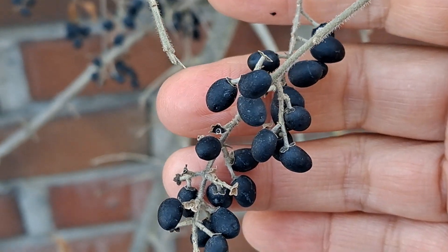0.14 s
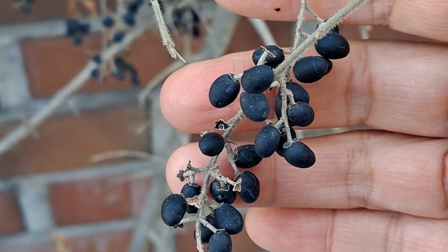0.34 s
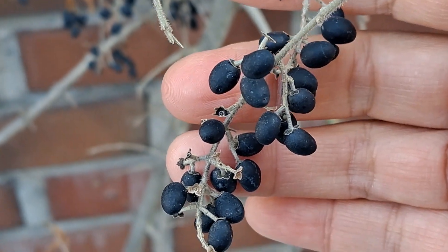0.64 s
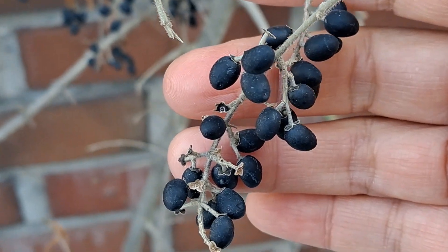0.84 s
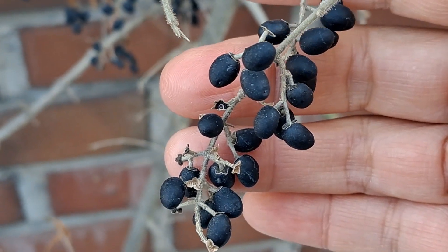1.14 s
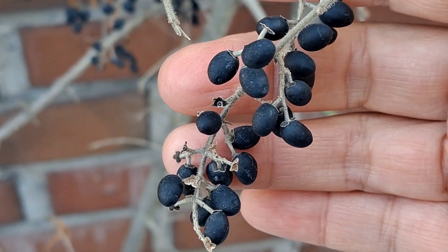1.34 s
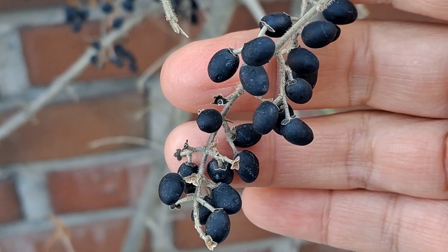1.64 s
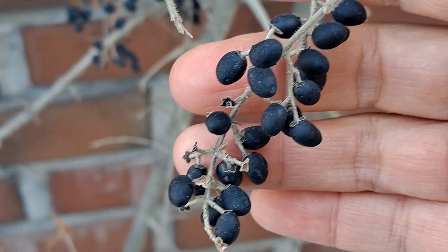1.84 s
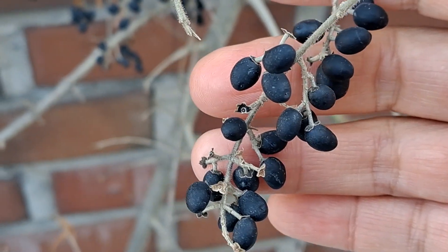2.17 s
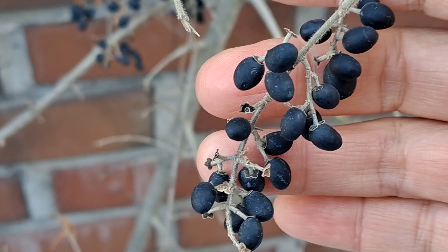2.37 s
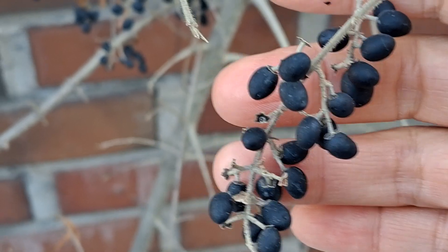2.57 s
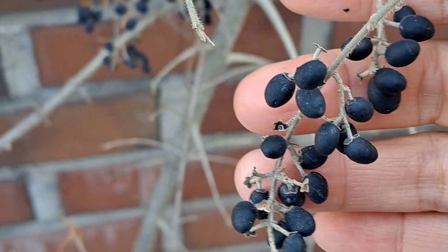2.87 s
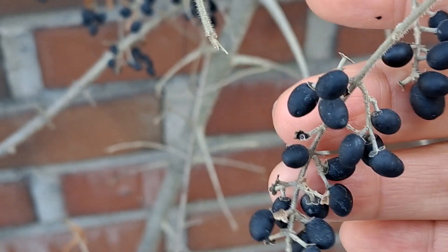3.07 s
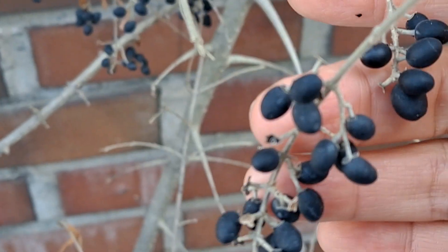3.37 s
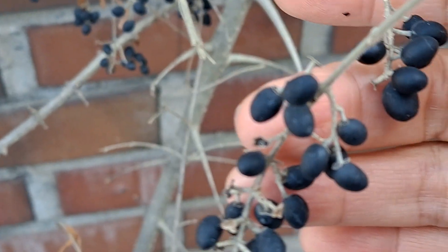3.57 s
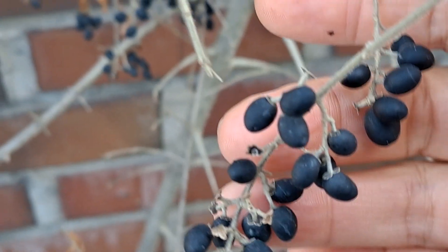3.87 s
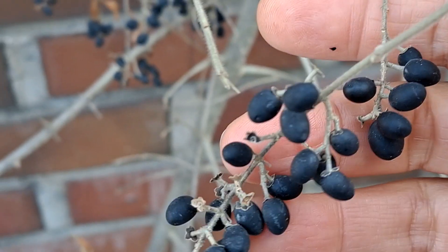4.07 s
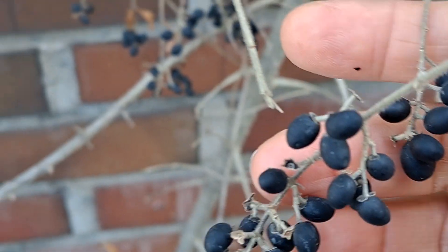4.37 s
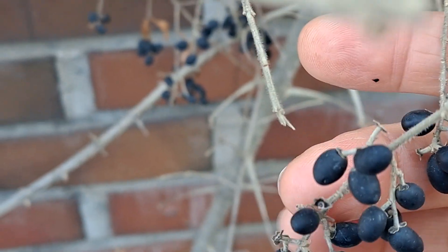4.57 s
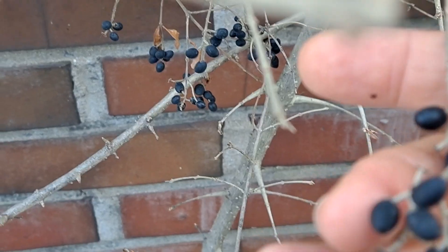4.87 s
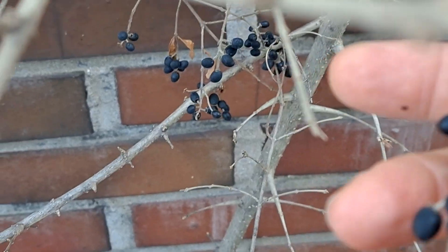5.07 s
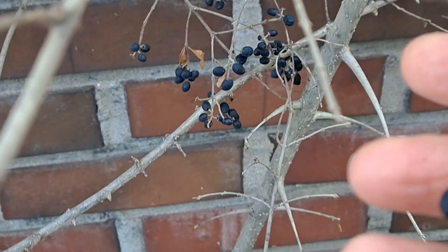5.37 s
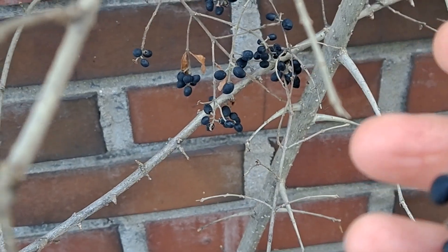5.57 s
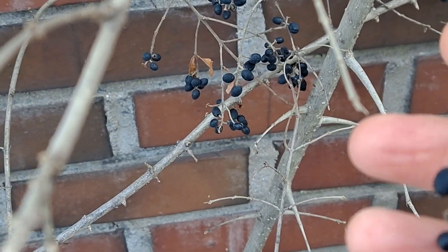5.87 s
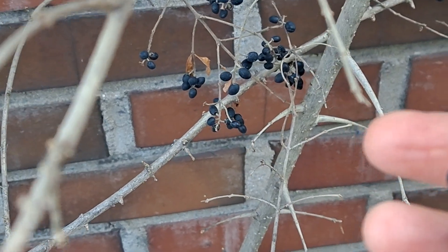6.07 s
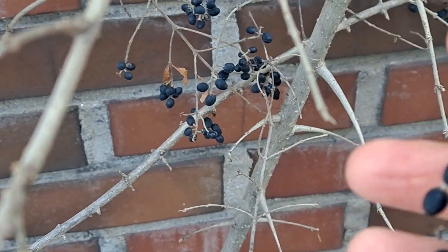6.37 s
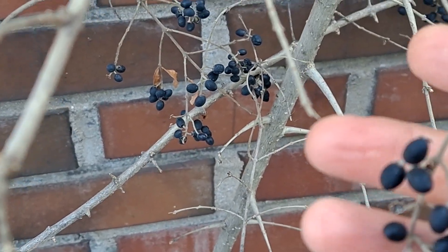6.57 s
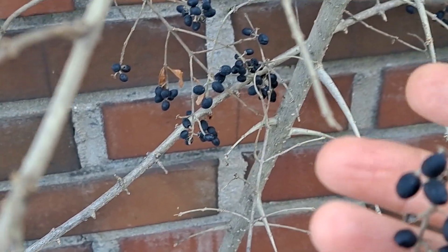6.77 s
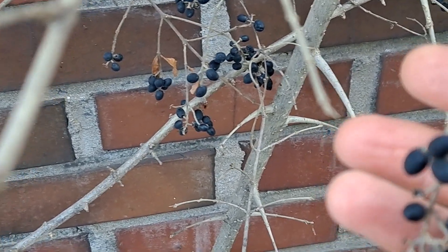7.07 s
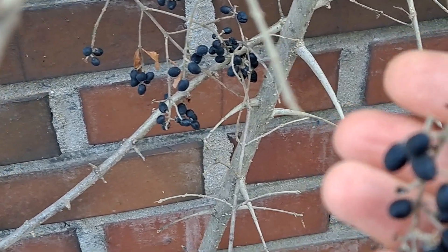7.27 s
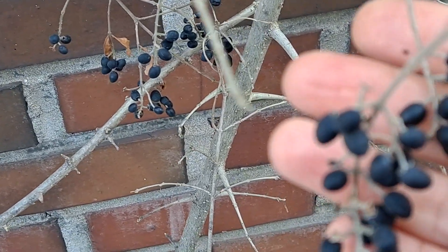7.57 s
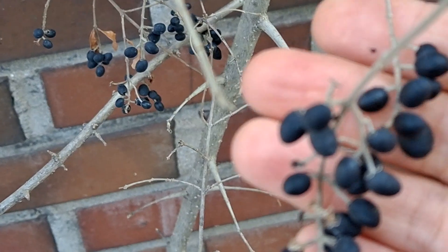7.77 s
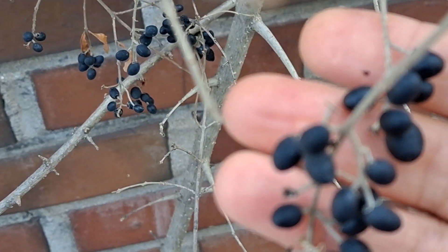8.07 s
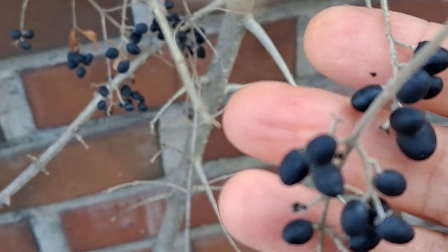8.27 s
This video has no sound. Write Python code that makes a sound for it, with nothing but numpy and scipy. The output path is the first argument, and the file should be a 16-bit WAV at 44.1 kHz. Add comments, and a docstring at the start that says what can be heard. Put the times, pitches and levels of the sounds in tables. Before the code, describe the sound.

Far-off engines hum and thin brakes squeal outdoors, while a hand faintly rubs a berry sprig and a distant bird whistles.

```python
"""Beside a brick wall, town traffic far off: a low rumble, tyre roar from the left, engines rising and
sinking, and thin friction squeals, as of far brakes. Later come faint bird calls: first a blur of
echoes, then two rising whistles. Close to the microphone a hand holds a sprig of berries; skin slides
on bark and the twigs tick faintly. The right microphone port is quieter and duller than the left."""
import sys
import numpy as np
from scipy import signal
from scipy.fft import rfft, irfft, next_fast_len
from scipy.io import wavfile
from scipy.ndimage import map_coordinates

SR = 44100
rng = np.random.default_rng(int(sys.argv[2]) if len(sys.argv) > 2 else 0)


def transcribe(signal):
    """Save signal, clipped to [-1, 1], as a 16-bit WAV file at the path in sys.argv[1]."""
    frames = np.atleast_2d(signal).T
    limited = np.clip(frames, -1, 1)
    pcm = np.round(limited * 32767).astype(np.int16)
    wavfile.write(sys.argv[1], SR, pcm)


N = 371763
TIME = np.arange(N) / SR
FFT_SIZE = next_fast_len(N, True)
BIN_HZ = np.maximum(np.arange(FFT_SIZE // 2 + 1) * SR / FFT_SIZE, 1)


def from_db(db):
    """Decibels to gain."""
    return np.exp(np.asarray(db) * (np.log(10) / 20))


def rms_one(x):
    """Scale to rms 1."""
    return x / np.sqrt(np.mean(x ** 2) + 1e-20)


def fade(spans):
    """What is left after so many time constants."""
    return np.exp(-np.clip(spans, 0, 20))


def swell(peak_s, spread_s):
    """A smooth rise and fall of height 1."""
    return fade(((TIME - peak_s) / spread_s) ** 2)


def held(age, length, rise_s, release_s):
    """Attack towards 1, hold and release."""
    return (1 - fade(age / rise_s)) * fade((age - length) / release_s)


def drift(rate):
    """A smooth random curve of spread about 1 that changes about rate times a second."""
    knots = rng.standard_normal(4096)
    return map_coordinates(knots, [TIME[::32] * rate], order=3, mode="wrap").repeat(32)[:N]


def in_time(rows):
    """The columns of a curve at every sample."""
    times, *columns = np.transpose(rows)
    return [np.interp(TIME, times, column) for column in columns]


def add(out, start_s, sound):
    """Lay a stereo sound into the mix from start_s on."""
    first = int(start_s * SR)
    low, high = max(first, 0), min(first + sound.shape[1], N)
    out[:, low:high] += sound[:, low - first:high - first]


def colour(points):
    """Gain at every frequency, falling away steeply above the last point."""
    hz, db = np.transpose(points)
    return from_db(np.interp(np.log(BIN_HZ), np.log(hz), db)) / np.maximum(BIN_HZ / hz[-1], 1) ** 2


def noise_field(spectrum, likeness, lag_s=0):
    """Noise at the two ports: a shared part reaches the right one lag_s later, the rest is diffuse."""
    left, diffuse = rfft(rng.standard_normal((2, FFT_SIZE))) * np.sqrt(SR / 2)
    delayed = left * np.exp(-2j * np.pi * BIN_HZ * lag_s)
    right = likeness * delayed + np.sqrt(1 - likeness ** 2) * diffuse
    return irfft(np.array([left, right]) * colour(spectrum), FFT_SIZE)[:, :N]


def narrow_tone(hz, width_hz, skirt_ratio):
    """Noise in a narrow resonance that follows hz: a sharp line on soft skirts, rms 1."""
    phase = 2 * np.pi * np.cumsum(hz) / SR
    grain = rng.standard_normal((2, 2, len(hz)))
    for edge_hz in (width_hz / 2, min(width_hz * skirt_ratio, SR / 10)):
        grain = signal.lfilter(*signal.butter(1, edge_hz, fs=SR), grain)
    return rms_one(grain[0] * np.cos(phase) + grain[1] * np.sin(phase))


# Noise floor at the microphone, as a density: f/Hz, level/dB
HISS_SPECTRUM = [(2000, -113), (4200, -113), (5200, -111.5), (8500, -111), (10500, -119), (12500, -117.3),
                 (13500, -115), (16000, -114)]
def hiss():
    """A faint steady hiss, almost unrelated at the two ports."""
    return noise_field(HISS_SPECTRUM, likeness=.029)


# Thin calls, as of birds further off: t/s, length/s, f/Hz, line width/Hz, level/dB
DISTANT_CALLS = [(5.89, .08, 7170, 90, -79), (6.041, .38, 6090, 70, -73), (6.13, 0.27, 5720, 109.8, -71.5),
                 (6.201, .55, 5930, 200, -77), (6.286, .15, 7220, 70, -74), (6.46, .3, 5700, 130, -72),
                 (6.467, 0.39, 6090, 80, -74), (7.97, 0.14, 7370, 70, -78)]
def far_calls(rise_s=.064, release_s=.099):
    """Calls that arrive only as echoes: their pitches overlap in a soft, shimmering band."""
    out, age = np.zeros((2, N)), TIME[:SR + SR // 4]
    for start, length, hz, width_hz, level_db in DISTANT_CALLS:
        tone = narrow_tone(np.full(len(age), hz), width_hz, skirt_ratio=3.6)
        add(out, start, from_db(level_db) * held(age, length, rise_s, release_s) * tone)
    return out


# Whistles, as of one far bird: t/s, length/s, wait before the climb/s, level/dB
RISING_WHISTLES = [(7.018, .2, .12, -65.5), (7.684, 0.25, 0.065, -66.5)]
def whistles(from_hz=5710, to_hz=6110, climb_s=.055, echo_t60_s=.78):
    """Each whistle swells and slides upwards; echoes from the walls hold the pitches it has passed."""
    out, age = np.zeros((2, N)), TIME[:SR]
    for start, length, wait, level_db in RISING_WHISTLES:
        hz = to_hz - (to_hz - from_hz) * fade((age - wait) / climb_s)
        tone = narrow_tone(hz, width_hz=50, skirt_ratio=6)
        call = from_db(level_db) * held(age, length, rise_s=.027, release_s=.02) * tone
        echoes = rng.standard_normal((2, SR)) * fade(np.log(1000) * age / echo_t60_s)
        add(out, start, signal.fftconvolve(call, echoes / np.linalg.norm(echoes[0]), axes=1))
    return out


def touches(rows, crackle, rise_s, decay_s):
    """Short bursts of crackle from the sprig, some fuller, some thinner."""
    out = np.zeros((2, N))
    for peak_s, level_db, edge_hz in rows:
        low_cut = signal.butter(2, min(edge_hz, SR / 3), "high", fs=SR, output="sos")
        burst = fade(np.maximum((peak_s - TIME) / rise_s, (TIME - peak_s) / decay_s))
        out += from_db(level_db) * burst * rms_one(signal.sosfilt(low_cut, crackle))
    return out


# Colours of the sprig, close to the microphone: f/Hz, relative level/dB
RUB_SPECTRUM = [(2500, 3), (4200, -4), (5000, 2), (5800, -4.5), (7000, -4), (10000, -11), (16000, -11)]
CRACKLE_SPECTRUM = [(2500, 1), (4500, -0.5), (7500, 0), (10500, -9), (16000, -7.5)]
# Fingers sliding along the twigs: t/s, length/s, level/dB
FINGER_SLIDES = [(3.68, 0.7, -67), (4.453, 0.93, -65.5), (5.5, 1.7, -74), (7.33, .28, -72)]
# Twigs catching, berries brushing the skin: t/s, level/dB, low-cut f/Hz
TWIG_TICKS = [(3.853, -54, 1794), (4.794, -61, 2500), (5.158, -60, 4500), (5.584, -58, 4500),
              (5.606, -56, 7500), (6.712, -64, 7015)]
BERRY_BRUSHES = [(4.03, -63, 8980), (4.58, -67, 7620), (4.78, -68, 4000), (4.88, -63, 7600),
                 (5.65, -65, 13070), (6.735, -67, 10000), (7.51, -74, 5000), (7.57, -62, 5000)]
def sprig(grain_db=1.0, catch_db=1.7, brush_grain_db=.5):
    """Skin slides over dry bark in fine grains, catching unevenly; twigs tick and berries brush past."""
    sliding = sum(from_db(level_db) * held(TIME - start, length, rise_s=.045, release_s=.2)
                  for start, length, level_db in FINGER_SLIDES)
    bark = noise_field(RUB_SPECTRUM, likeness=.1)
    rub = sliding * rms_one(bark * from_db(grain_db * drift(300) + catch_db * drift(14)))
    crackle = noise_field(CRACKLE_SPECTRUM, likeness=.1)
    ticks = touches(TWIG_TICKS, crackle, rise_s=.0014, decay_s=.007)
    grainy = crackle * from_db(brush_grain_db * drift(200))
    return rub + ticks + touches(BERRY_BRUSHES, grainy, rise_s=.031, decay_s=.033)


# Squeals, as of far brakes, clean or rough: t/s, length/s, f/Hz, line width/Hz, level/dB
BRAKE_SQUEALS = [(-.1, 0.17, 13780, 90, -62), (0, 0.13, 9690, 15, -72), (0, .22, 14850, 200, -70),
                 (0, 0.64, 15700, 200, -65.5), (0, 0.94, 8250, 35, -83), (.18, .12, 15100, 90, -66),
                 (.24, .1, 10790, 30, -78), (.33, .14, 14500, 90, -68), (0.327, 0.13, 7300, 70, -79),
                 (.35, .3, 3930, 200, -77), (.49, .06, 15430, 120, -66), (.524, .17, 10920, 22, -69.5),
                 (.595, .045, 13330, 110, -65), (.6, 0.33, 14500, 350, -73), (0.677, 0.22, 10770, 30, -64),
                 (.85, 0.29, 13320, 120, -66.5), (.88, .08, 9720, 40, -77), (1.291, 0.18, 10950, 12, -60),
                 (1.302, .35, 3390, 250, -76), (1.428, .13, 13120, 107, -64), (1.46, .28, 12100, 700, -76),
                 (1.557, .1, 10900, 60, -69), (1.6, .12, 13180, 140, -71), (1.99, 0.071, 13160, 150, -68),
                 (2.15, .06, 13900, 100, -71), (2.17, 0.36, 13340, 190, -73), (2.28, 0.27, 6550, 220, -79),
                 (2.3, .38, 14350, 280, -75), (2.288, .17, 5080, 70, -71), (2.45, .55, 15500, 280, -75),
                 (2.5, .08, 5085, 120, -78), (2.679, .13, 5060, 70, -72), (2.9, .16, 5075, 183, -81),
                 (6.26, .12, 13280, 300, -76), (6.8, .8, 3066, 15, -83), (7.03, .18, 13380, 320, -77.5),
                 (7.47, .12, 13300, 300, -76), (7.697, .66, 3080, 12, -82), (7.72, 0.27, 15000, 450, -74),
                 (7.88, 0.15, 13600, 500, -75)]
def squeals(rasp_db=-13, chatter_db=2.5, echo_t60_s=.72):
    """Friction grips unevenly and excites a narrow, rasping resonance; the street carries it on."""
    out, age = np.zeros((2, N)), TIME[:SR + SR // 2]
    for start, length, hz, width_hz, level_db in BRAKE_SQUEALS:
        pitch = np.full(len(age), hz)
        tone = narrow_tone(pitch, width_hz, skirt_ratio=3.5)
        rasp = from_db(rasp_db) * narrow_tone(pitch, width_hz=1000, skirt_ratio=1)
        grip = from_db(level_db + chatter_db * drift(22)[:len(age)])
        envelope = held(age, length, rise_s=.032, release_s=echo_t60_s / np.log(1000))
        add(out, start, grip * envelope * (tone + rasp))
    return out


def drone(hz, waver_hz, fading_db=2.5, fading_rate=12):
    """An engine's firing tone, rms 1; many echo paths make it waver and fade."""
    phase = 2 * np.pi * np.cumsum(hz + waver_hz * drift(fading_rate)) / SR
    return rms_one(np.sin(phase) * from_db(fading_db * drift(fading_rate)))


# A far engine revving up once and running down: t/s, f/Hz, level/dB
REV_CURVE = [(0, 224.3, -56), (.6, 219, -50), (1, 216, -42.5), (1.6, 213, -51), (1.95, 215, -54),
             (2.4, 254.2, -47.5), (3.5, 268.5, -43), (4.2, 257, -46), (4.9, 245, -44.5), (5.8, 240.1, -44),
             (6.5, 227, -44), (7, 221, -44.5), (7.5, 213.7, -50), (8.43, 208.4, -50.5)]
# Other far engines swelling and sinking back: peak t/s, spread/s, f/Hz, level/dB
BRIEF_DRONES = [(0, 0.42, 306, -51.5), (1.3, 0.056, 446.5, -51.5), (1.82, 0.11, 455, -49.5),
                (2.62, 0.35, 452.4, -50), (4.15, 0.37, 349, -51.5), (4.45, 0.42, 319, -49.5),
                (5.4, 0.34, 318.3, -46), (5.93, 0.22, 308.5, -44.5), (6.3, .35, 341.6, -50.5)]
def engines(steady_hz=135.2, steady_db=-45.5, recede_db_per_s=.36):
    """One engine recedes at a steady speed, one revs, others come through for a moment."""
    steady = from_db(steady_db - recede_db_per_s * TIME) * drone(steady_hz, waver_hz=3.236)
    rev_hz, rev_db = in_time(REV_CURVE)
    revving = from_db(rev_db) * drone(rev_hz, waver_hz=2.64)
    others = sum(from_db(level_db) * swell(peak_s, spread_s) * drone(hz, waver_hz=2.18)
                 for peak_s, spread_s, hz, level_db in BRIEF_DRONES)
    return steady + revving + others


# A heavy exhaust in the distance: t/s, firing f/Hz, level/dB
EXHAUST_CURVE = [(0, 54.5, -43.5), (.92, 52.5, -38.5), (1.15, 52.01, -51), (1.6, 50, -39),
                 (2.3, 58.13, -46), (3.4, 58.15, -44.5), (4.1, 52.96, -48.5), (4.8, 52.95, -43),
                 (5.7, 54.53, -51), (6.2, 54.84, -42), (6.8, 56.7, -44), (7.5, 59.9, -37.5),
                 (7.7, 59.1, -62), (8.43, 58, -55)]
def exhaust():
    """A deep throb that follows the load: it eases off, pulls again and drops away."""
    hz, level_db = in_time(EXHAUST_CURVE)
    return from_db(level_db) * drone(hz, waver_hz=1.852, fading_db=1.5, fading_rate=7)


# The far roads from beside the wall, as densities before trim and swell: f/Hz, level/dB
RUMBLE_SPECTRUM = [(20, -79), (33, -71), (39, -72.5), (46, -58.5), (54, -54), (70, -57.5), (100, -59),
                   (130, -58), (155, -61.5), (185, -65), (240, -63.5), (340, -67.5), (420, -73.5),
                   (900, -105)]
TYRE_SPECTRUM = [(200, -78.5), (400, -74), (530, -73), (760, -75.5), (900, -72.5), (1100, -76), (1400, -82),
                 (1800, -84.5), (2200, -89.5), (2650, -99), (3050, -100), (3600, -110), (5000, -125)]
def traffic(rumble_trim_db=-1.1, rumble_swell_db=1.44, tyre_trim_db=-.08, tyre_swell_db=1.24):
    """Long waves of rumble reach both ports alike; tyre roar comes from the left and from the walls."""
    busy = swell(peak_s=4.64, spread_s=2.34)  # the traffic thickens once
    rumble = noise_field(RUMBLE_SPECTRUM, likeness=np.exp(-(BIN_HZ / 900) ** 2))
    rumble *= from_db(rumble_trim_db + rumble_swell_db * busy)
    tyres = noise_field(TYRE_SPECTRUM, likeness=.5 / np.sqrt(1 + (BIN_HZ / 2100) ** 4), lag_s=.0005)
    flutter_db = .76 * drift(6)
    tyres *= from_db(tyre_trim_db + tyre_swell_db * busy + flutter_db)
    return rumble + tyres


def scene():
    """Far traffic and birds, the sprig close by, and a faint hiss under all."""
    street = traffic() + exhaust() + engines() + squeals()
    birds = whistles() + far_calls()
    return street + birds + sprig() + hiss()


# The microphone's right port against its left: f/Hz, level/dB
RIGHT_PORT_SHADE = [(50, -4), (100, -5), (200, -4.5), (450, -3), (900, -5), (1350, -4), (1800, -8),
                    (2400, -13.5), (4000, -11), (16000, -10.5)]
def record(dry):
    """The microphone's right port is shaded; both channels are cut steeply above 15.7 kHz."""
    right = irfft(rfft(dry[1], FFT_SIZE) * colour(RIGHT_PORT_SHADE), FFT_SIZE)[:N]
    top_cut = signal.ellip(12, .1, 80, 15700, fs=SR, output="sos")
    return signal.sosfilt(top_cut, np.array([dry[0], right]))


dry = scene()
out = record(dry)
transcribe(out)
```